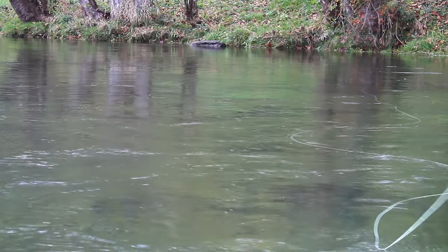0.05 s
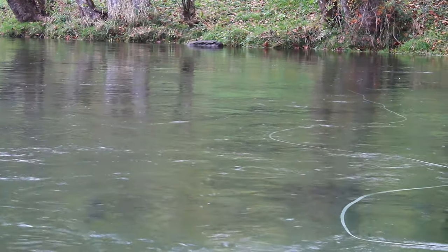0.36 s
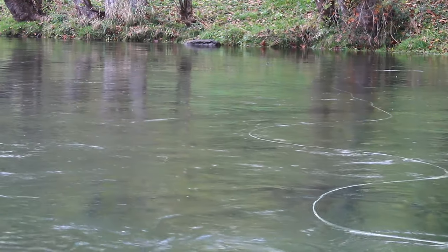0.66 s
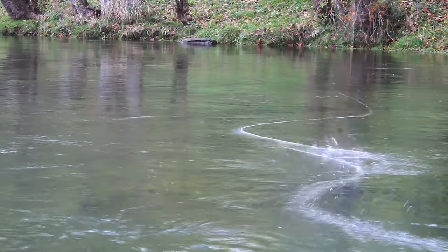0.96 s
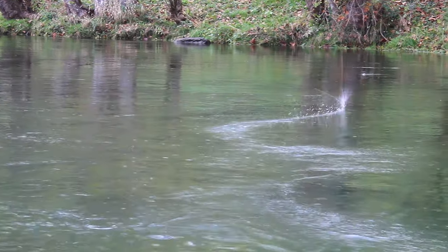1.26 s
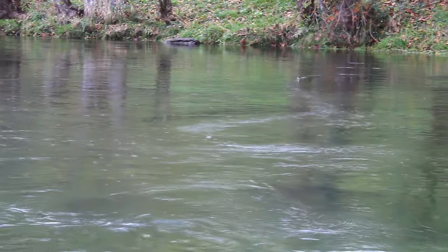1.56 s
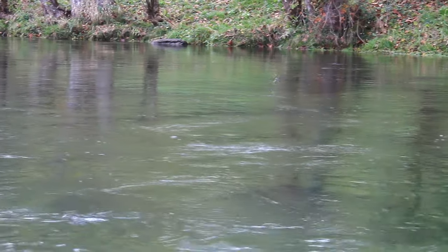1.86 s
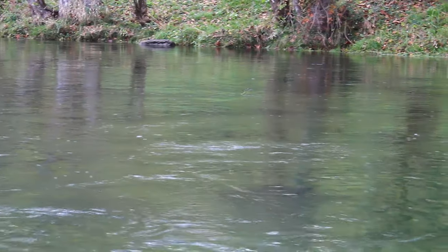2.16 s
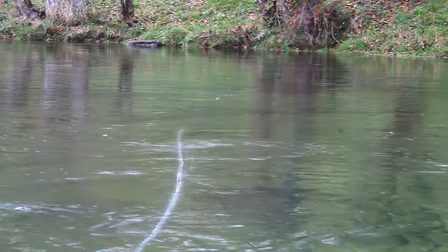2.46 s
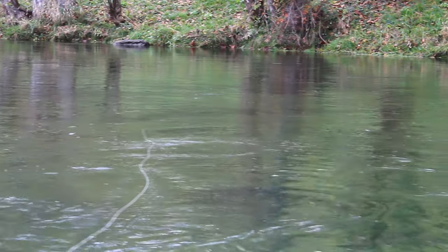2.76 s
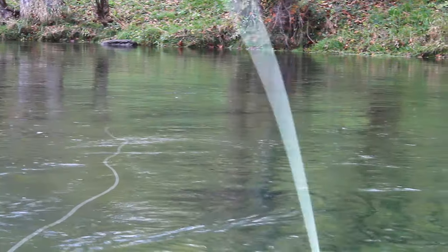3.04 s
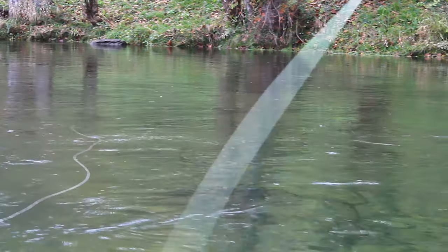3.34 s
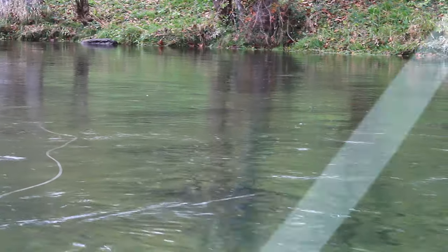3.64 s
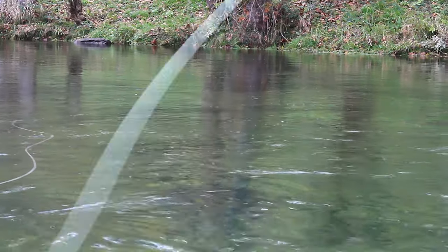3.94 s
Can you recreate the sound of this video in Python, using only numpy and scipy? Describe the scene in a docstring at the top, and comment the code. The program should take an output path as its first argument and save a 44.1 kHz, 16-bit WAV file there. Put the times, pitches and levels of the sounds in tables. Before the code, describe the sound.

A fly line zips through the rod's guides in four quick pulls, each rising and falling in pitch. Before them, drops patter lightly onto a rushing river. Wind rumbles on the close microphone, with dull bumps near the end.

```python
"""Fly casting on a riverbank

One microphone on the bank, near the angler. The river rushes, a motor hums low and steady, and a thin
hiss sits high above. The rod sweeps the air; the line peels off the water and sheds drops, then is
pulled four times through the rod's guides, where its fine texture sings a zip that rises and falls
with its speed. Wind and handling bump the microphone."""
import sys
import numpy as np
from scipy import signal
from scipy.fft import rfft, irfft, next_fast_len
from scipy.io import wavfile
from scipy.ndimage import uniform_filter1d, map_coordinates

SR = 44100
rng = np.random.default_rng(int(sys.argv[2]) if len(sys.argv) > 2 else 0)


def pcm_store(signal):
    """Save signal as 16-bit PCM."""
    levels = np.round(np.clip(np.atleast_2d(signal), -1, 1) * 32767)
    wavfile.write(sys.argv[1], SR, levels.astype(np.int16).T)


N = 176400
TOP_HZ = 15650

# Rush of the current: freq_hz, relative_db
RIVER_COLOUR = [(180, -24), (300, -5), (424, -1), (492, -7), (534, -4), (743, -4), (1390, -3.5),
                (2170, -9.5), (4130, -18), (4710, -19.5), (6670, -26.5), (10400, -29), (15500, -32.5)]
# The motor's strong harmonics over time: time_s, second_db, third_db, fourth_db
MOTOR_LOW_ORDERS = [(0.0, -29, -33, -38), (0.08, -27, -35, -48), (0.57, -29, -31.5, -39.5),
                    (1.11, -27, -35.5, -33.5), (2.92, -34.5, -33.5, -39.5), (3.45, -32.5, -30.5, -31.5),
                    (3.9, -33, -32.5, -37.5)]
# Its faint upper harmonics: harmonic_number, level_db
MOTOR_HIGH_ORDERS = [(5, -50.5), (6, -53), (7, -57.5)]
# Constant wind rumble: freq_hz, relative_db
RUMBLE_COLOUR = [(12, 6), (25, 1.5), (42, 4), (55, -12.5), (110, -5), (150, -14), (175, -11.5),
                 (230, -21.5), (300, -29.5), (450, -66), (800, -90), (2000, -120)]
# Gusts on the microphone: centre_s, half_length_s, level_db
GUST_SWELLS = [(0.272, 0.085, -15.5), (0.676, 0.1, -21), (1.203, 0.09, -15), (1.597, 0.065, -19)]
# Their deep buffeting: freq_hz, relative_db
BUFFET_COLOUR = [(5, 11), (13, 12), (22, 0.5), (40, -6), (120, -59), (400, -130)]
# Sweeps of the rod: centre_s, half_length_s, level_db
ROD_SWEEPS = [(.05, 0.06, -45.5), (2.65, 0.17, -44.5), (3.55, 0.24, -47.5)]
# Air rushing past the rod: freq_hz, relative_db
SWEEP_COLOUR = [(120, -33), (220, 7), (360, 2), (550, -10), (1200, -7.5), (3000, -45), (8000, -100)]
# Drops landing on the river: start_s, relative_db, pitch_hz
FALLING_DROPS = [(.08, -38, 7660), (.266, -33, 12000), (.313, -36, 11500), (0.7502, -27.5, 5100),
                 (.758, -40, 11500), (.801, -27.5, 11000), (.8148, -34, 7000), (.8174, -33, 9900),
                 (0.825, -24, 10200), (0.84, -34, 7700), (0.841, -23, 5160), (0.998, -30, 8200),
                 (1.007, -30, 9050), (1.054, -32.5, 10500), (1.113, -33.5, 8050), (1.186, -35, 12000),
                 (1.2338, -24, 7560), (1.234, -29, 11000)]
# Splashing at the surface: freq_hz, relative_db
WATER_COLOUR = [(2000, -19), (5000, 4), (8000, 5), (12000, 4.5), (15500, -19)]
# The line tearing off the water: centre_s, half_length_s, level_db
LINE_TEARS = [(.746, 0.0045, -44.5), (.812, 0.028, -50)]
# Slack line striking a guide: start_s, relative_db
GUIDE_SLAPS = [(1.448, -48), (1.522, -44), (1.741, -41), (1.818, -43), (1.94, -42.5), (2.306, -44),
               (2.458, -30), (2.466, -41), (2.725, -39), (3.164, -38), (3.257, -41), (3.46, -43),
               (3.613, -46)]
# The tick of each strike: freq_hz, relative_db
TICK_COLOUR = [(300, -9), (1500, 10.5), (5000, 7), (9000, 5), (13000, 5), (15500, -22)]
# Line speed as the rate its texture passes a guide, one list a pull: time_s, pitch_hz
PULL_SPEEDS = [
    [(1.48, 1637), (1.515, 2240), (1.55, 2500), (1.575, 2920), (1.6, 3350), (1.635, 3480), (1.67, 4050),
     (1.72, 4800), (1.755, 4560), (1.79, 3160), (1.86, 2000)],
    [(2.36, 2414), (2.39, 3450), (2.425, 4320), (2.445, 4060), (2.48, 6420), (2.535, 6300), (2.56, 5130),
     (2.6, 4200), (2.63, 3240), (2.72, 1980)],
    [(3.165, 6670), (3.195, 4930), (3.212, 5100), (3.23, 6000), (3.26, 7190), (3.29, 6400), (3.32, 5070),
     (3.345, 4400), (3.362, 3300), (3.39, 2780)],
    [(3.65, 1854), (3.69, 2550), (3.72, 3210), (3.775, 4750), (3.8, 5860), (3.83, 7900), (3.85, 7000),
     (3.88, 5180), (3.91, 4240), (3.95, 3690), (4.0, 3100)],
]
# How hard the line rubs, one list a pull: time_s, relative_db
PULL_SCRAPES = [
    [(1.46, -73), (1.5, -41.5), (1.53, -57), (1.6, -46), (1.64, -50), (1.72, -46), (1.8, -57), (1.9, -54)],
    [(2.3, -57), (2.36, -45.5), (2.41, -47.5), (2.47, -36), (2.51, -45), (2.535, -38), (2.62, -42),
     (2.675, -37.5), (2.79, -45), (2.87, -61)],
    [(3.158, -66), (3.166, -36), (3.19, -39.5), (3.215, -38.5), (3.28, -40.5), (3.32, -43), (3.37, -39),
     (3.41, -49), (3.46, -46.5), (3.52, -65)],
    [(3.64, -64), (3.676, -45), (3.72, -48), (3.77, -42), (3.83, -40), (3.885, -42), (3.92, -41),
     (3.94, -43), (4.0, -42)],
]
# How strongly it sings, one list a pull: time_s, fundamental_db, overtones_db (both relative)
PULL_TONES = [
    [(1.47, -65, -50), (1.5, -53, -42), (1.535, -42, -38.5), (1.56, -41, -44), (1.6, -40, -44),
     (1.635, -45.5, -53), (1.665, -46, -47), (1.7, -48, -56), (1.76, -49, -58), (1.87, -54, -59)],
    [(2.33, -55, -56), (2.39, -43, -43.5), (2.45, -45, -48), (2.49, -41, -44), (2.52, -45, -44),
     (2.535, -38, -42), (2.55, -45, -53), (2.572, -36.5, -59), (2.61, -44, -38.5), (2.635, -45, -48),
     (2.68, -62, -62)],
    [(3.158, -70, -70), (3.17, -33.5, -54), (3.185, -40, -44), (3.21, -38, -36), (3.235, -34, -30),
     (3.262, -40, -43), (3.285, -40, -29), (3.317, -40, -56), (3.342, -52, -44), (3.367, -35.5, -54),
     (3.4, -56, -60)],
    [(3.64, -66, -62), (3.69, -42, -38), (3.725, -46, -39.5), (3.77, -41, -41), (3.79, -35, -44),
     (3.83, -34, -44), (3.86, -47, -50), (3.88, -46, -39), (3.92, -42, -35.5), (3.94, -44, -53),
     (3.97, -42, -43), (4.0, -47, -51)],
]
# Roughness and brightness of each pull: speed_jitter_ratio, scrape_tilt_db_per_octave
PULL_CHARACTERS = [(0.047, -2.5), (0.0396, -0.5), (0.0264, 3.5), (0.0093, 2)]
# Overtones of the line's buzz: harmonic_number, relative_db
BUZZ_OVERTONES = [(2, 0), (3, -10.5), (4, -13)]
# How a guide colours the buzz: freq_hz, gain_db
GUIDE_RESPONSE = [(1500, 5), (2600, 4), (8000, 0.5), (11000, 0), (13000, -5.5), (15500, -12)]
# Friction of the line on a guide: freq_hz, relative_db
SCRAPE_COLOUR = [(250, -2), (800, 1), (2000, 2), (3300, 0.5), (4800, 4.5), (7200, -0.5), (9000, -4.5),
                 (11500, -7.5), (13300, -9.5), (14500, -13), (15500, -34)]
# Resonances of the rod and guides: freq_hz, width_hz, relative_db
ROD_RESONANCES = [(3380, 120, -11), (3980, 48, -10), (4770, 51, -5.5), (6300, 66, -10), (8230, 100, -8),
                  (8730, 69, -4), (9470, 150, 0), (10680, 430, -4), (12700, 700, -6)]
# Brief rubs on the rod: centre_s, half_length_s, relative_db
ROD_RUBS = [(1.755, .012, -45), (1.795, 0.0075, -42.5), (1.822, .018, -56), (1.916, 0.0063, -39),
            (2.095, 0.013, -45.5), (2.31, 0.0087, -45)]
# The rasp of those rubs: freq_hz, relative_db
RASP_COLOUR = [(2500, -13), (3800, -3), (4600, 3), (5200, -5), (5900, -3), (7000, -28), (12000, -28)]
# Slack running on through another guide: start_s, length_s, first_hz, last_hz, relative_db
SLACK_RUNS = [(1.774, 0.091, 4650, 4240, -48), (2.589, 0.052, 11500, 8700, -56),
              (2.646, 0.04, 7960, 8560, -42), (2.647, 0.072, 5170, 3770, -38.5),
              (2.723, 0.09, 4940, 3870, -44), (3.355, 0.062, 6040, 3950, -42.5),
              (3.405, 0.078, 3790, 2770, -46)]
# Handling knocks at the microphone: start_s, relative_db, pitch_hz, t60_s
KNOCKS = [(3.207, -3.5, 41.7, 0.096), (3.484, -3, 55, 0.079), (3.497, -3.5, 134, 0.04),
          (3.951, -23, 416, 0.033), (3.965, -20.5, 262.2, 0.81)]
# The thud in each knock: freq_hz, relative_db
THUD_COLOUR = [(40, 16.5), (200, -11), (400, -5), (800, -17), (2000, -33), (8000, -90)]


def amp(db):
    """Decibels to gain."""
    return 10 ** (np.asarray(db) / 20)


def unit(x):
    """Scale to rms 1."""
    return x / np.sqrt(np.mean(x ** 2) + 1e-20)


def db_at(colour, hz):
    """Read (freq_hz, db) points along a log frequency axis."""
    freqs, levels = np.transpose(colour)
    return np.interp(np.log(hz + 1), np.log(freqs + 1), levels)


def curves(rows):
    """One value per sample for each column after the time."""
    times, *columns = np.transpose(rows)
    return [np.interp(np.arange(N) / SR, times, column) for column in columns]


def swells(rows):
    """A bell-shaped swell of gain for each (centre_s, half_length_s, db)."""
    t = np.arange(N) / SR
    return sum(amp(db) * np.exp(-((t - centre) / half) ** 2) for centre, half, db in rows)


def wobble(rate_hz):
    """A smooth random curve with rate_hz knots a second."""
    return map_coordinates(rng.standard_normal(N // 8), [np.arange(N) * rate_hz / SR], mode="wrap")


def filtered(x, response):
    """Filter x by a gain given as a function of frequency."""
    size = next_fast_len(N + SR // 2)
    return irfft(rfft(x, size) * response(np.fft.rfftfreq(size, 1 / SR)), size)[:N]


def noise(colour):
    """Coloured noise of rms 1."""
    return unit(filtered(rng.standard_normal(N), lambda hz: amp(db_at(colour, hz))))


def sine(hz):
    """A tone of rms 1 on a moving pitch."""
    return np.sqrt(2) * np.sin(2 * np.pi * (np.cumsum(hz) / SR + rng.random()))


def add(out, start_s, sound):
    """Mix a sound in at start_s."""
    part = out[int(np.clip(start_s * SR, 0, N)):][:len(sound)]
    part += sound[:len(part)]


def bubble(hz, cycles, rise=0.163):
    """A bubble's ring, peak 1: it rises in pitch and decays by 1/e in about `cycles` periods."""
    t = np.arange(SR // 20) / SR
    age = t * hz / cycles
    pitch_hz = hz * (1 + rise * np.tanh(age / 2))
    envelope = np.exp(-age) * (1 - np.exp(-5 * age))
    ring = envelope * np.sin(2 * np.pi * np.cumsum(pitch_hz) / SR)
    return ring / np.abs(ring).max()


def river(rush_db=-45.5, bubble_db=-50.5, bubble_hz=1416, count=700):
    """The current rushes past the bank with many small bubbles ringing in it."""
    babble = np.zeros(N)
    starts = rng.random(count) * N / SR
    for start, (size, pitch) in zip(starts, rng.standard_normal((count, 2))):
        ring = bubble(bubble_hz * np.exp(.35 * pitch), cycles=6.6)
        add(babble, start, amp(bubble_db + 2 * size) * ring)
    return babble + amp(rush_db + 0.23 * wobble(6.4)) * noise(RIVER_COLOUR)


def motor_hum(turn_hz=33.13):
    """A steady motor hums on harmonics of its turning rate."""
    hz = turn_hz * (1 + 0.0023 * wobble(4.3))
    orders = list(enumerate(curves(MOTOR_LOW_ORDERS), 2)) + MOTOR_HIGH_ORDERS
    return sum(amp(db + 0.45 * wobble(6.03)) * sine(order * hz) for order, db in orders)


def thin_hiss(centre_hz=10010, half_width_hz=130, level_db=-71.5):
    """A faint, narrow band of steady hiss high above the river."""
    band = filtered(rng.standard_normal(N), lambda f: 1 / (1 + ((f - centre_hz) / half_width_hz) ** 2))
    return amp(level_db) * unit(band)


def wind(rumble_db=-27):
    """Wind on the microphone: a low rumble and soft gusts."""
    rumble = amp(rumble_db + 0.38 * wobble(5.14)) * noise(RUMBLE_COLOUR)
    return rumble + swells(GUST_SWELLS) * noise(BUFFET_COLOUR)


def rod_whooshes():
    """The rod sweeps the air with a soft whoosh."""
    return swells(ROD_SWEEPS) * noise(SWEEP_COLOUR)


def drops(ring_db=-0.5, splash_db=-20, splash_t60_s=0.014, low_cut_hz=3700):
    """Drops off the line tick onto the river, each with a tiny splash; fine spray falls back too."""
    rings, splashes = np.zeros(N), np.zeros(N)
    t = np.arange(SR // 10) / SR
    for start, db, hz in FALLING_DROPS:
        add(rings, start, amp(db + ring_db) * bubble(hz, cycles=1.8))
        add(splashes, start, amp(db + splash_db - 60 * t / splash_t60_s))
    ticks = filtered(rings + spray(), lambda f: 1 - 1 / (1 + (f / low_cut_hz) ** 8))
    return ticks + splashes * noise(WATER_COLOUR)


def spray(centre_s=1.06, spread_s=0.2, droplet_db=-44, droplet_hz=9200):
    """A cloud of fine droplets lands, each a very short, high ring."""
    out = np.zeros(N)
    for when, size, pitch in rng.standard_normal((130, 3)):
        hz = min(droplet_hz * np.exp(.25 * pitch), TOP_HZ)
        add(out, centre_s + spread_s * when, amp(droplet_db + 2 * size) * bubble(hz, cycles=1.2))
    return out


def line_tear(grain_db=6):
    """The line tears off the surface with a wet crackle."""
    grain = unit(amp(grain_db * wobble(1100)))
    return swells(LINE_TEARS) * grain * noise(WATER_COLOUR)


def line_slaps(gain_db=-2, t60_s=.028):
    """Slack line snaps against a guide in short bursts of noise."""
    envelope = np.zeros(N)
    t = np.arange(SR // 10) / SR
    for start, db in GUIDE_SLAPS:
        add(envelope, start - .001, amp(db + gain_db - 60 * t / t60_s))
    return envelope * noise(TICK_COLOUR)


def scrape(tilt_db_per_octave, patch_db=3, grain_db=1.5):
    """The line rubs on a guide: grainy, uneven noise of rms 1, tilted above 2 kHz."""
    tilt = lambda f: amp(tilt_db_per_octave * np.log2(np.maximum(f, 2000) / 7000))
    spectra = signal.stft(filtered(noise(SCRAPE_COLOUR), tilt), nperseg=256)[2]
    # brief patches of random gain, each a few hundred Hz wide
    patches = uniform_filter1d(rng.standard_normal(spectra.shape), size=3, axis=0)
    patches = unit(uniform_filter1d(patches, size=7, axis=1))
    uneven = signal.istft(spectra * amp(patch_db * patches), nperseg=256)[1][:N]
    return unit(uneven * amp(grain_db * wobble(900)))


def buzz(hz, jitter, tone_db, overtones_db, fuzz=.68, flutter_db=2.6):
    """The line's texture passing a guide sings fuzzy, fluttering harmonics."""
    unsteady_hz = hz * (1 + jitter * wobble(1800) + .007 * wobble(120))
    harmonics = [(1, tone_db)] + [(k, overtones_db + db) for k, db in BUZZ_OVERTONES]
    out = np.zeros(N)
    for k, db in harmonics:
        gain = amp(db + db_at(GUIDE_RESPONSE, k * hz) + flutter_db * wobble(60))
        in_band = k * hz < TOP_HZ + 2000
        clear = (1 - fuzz) * sine(k * unsteady_hz)
        fuzzy = fuzz * wobble(400) * sine(k * unsteady_hz)
        out += gain * in_band * (clear + fuzzy)
    return out


def line_zips():
    """Four pulls through the guides: the line buzzes at the pitch of its speed, over a scrape."""
    out = np.zeros(N)
    t = np.arange(N) / SR
    during = lambda rows: (t > rows[0][0]) & (t < rows[-1][0] + .03)
    pulls = zip(PULL_SPEEDS, PULL_SCRAPES, PULL_TONES, PULL_CHARACTERS)
    for speed, rubbing, singing, (jitter, tilt) in pulls:
        hz, = curves(speed)
        scrape_db, = curves(rubbing)
        tone_db, overtones_db = curves(singing)
        out += during(rubbing) * amp(scrape_db) * scrape(tilt)
        out += during(singing) * buzz(hz, jitter, tone_db, overtones_db)
    return out


def rod_resonance(friction, ring_db=8.5):
    """The rod and its guides add their fixed resonances to the friction sounds."""
    def response(f):
        ring = sum(amp(db) * 1j * f * width / (hz * hz - f * f + 1j * f * width)
                   for hz, width, db in ROD_RESONANCES)
        return (1 + amp(ring_db) * ring) / (1 + .5 * amp(ring_db))
    return filtered(friction, response)


def rod_rubs():
    """Brief rubs rasp on the rod."""
    return swells(ROD_RUBS) * noise(RASP_COLOUR)


def slack_runs(overtones_db=-17.5):
    """Slack line runs on through another guide in short, gliding buzzes."""
    out = np.zeros(N)
    t = np.arange(N) / SR
    for start, length, first_hz, last_hz, db in SLACK_RUNS:
        progress = np.clip((t - start) / length, 0, 1)
        hz = first_hz * (last_hz / first_hz) ** progress
        envelope = np.sin(np.pi * progress)
        out += envelope * buzz(hz, jitter=0.033, tone_db=db, overtones_db=db + overtones_db)
    return out


def handling_bumps(attack_s=0.007, upper_ratio=2.52, upper_db=-22.5, thud_db=-18):
    """Dull knocks right at the microphone: a low mode, a weaker one above it and a soft thud."""
    ring, thud = np.zeros(N), np.zeros(N)
    t = np.arange(SR // 2) / SR
    for start, db, hz, t60 in KNOCKS:
        envelope = amp(db - 60 * t / t60) * (1 - np.exp(-t / attack_s))
        phase = 2 * np.pi * hz * t
        modes = np.sin(phase) + amp(upper_db) * np.sin(upper_ratio * phase)
        add(ring, start, envelope * modes)
        add(thud, start, envelope)
    return ring + amp(thud_db) * thud * noise(THUD_COLOUR)


def scene():
    """The riverside and the cast, in mono from one spot on the bank."""
    riverside = river() + motor_hum() + thin_hiss() + wind()
    cast = rod_whooshes() + drops() + line_tear() + line_slaps()
    pulls = rod_resonance(line_zips() + rod_rubs() + slack_runs())
    return (riverside + cast + pulls + handling_bumps())[None]


def record(dry):
    """The camera's microphone channel keeps nothing above its band limit."""
    return filtered(dry[0], lambda hz: hz < TOP_HZ)[None]


dry = scene()
out = record(dry)
pcm_store(out)
```